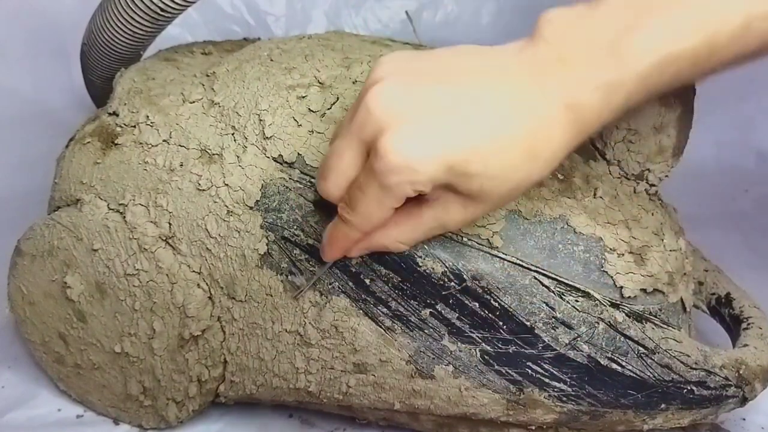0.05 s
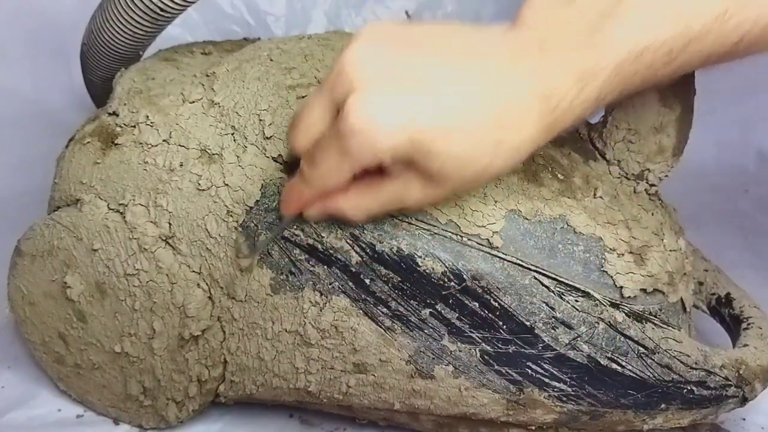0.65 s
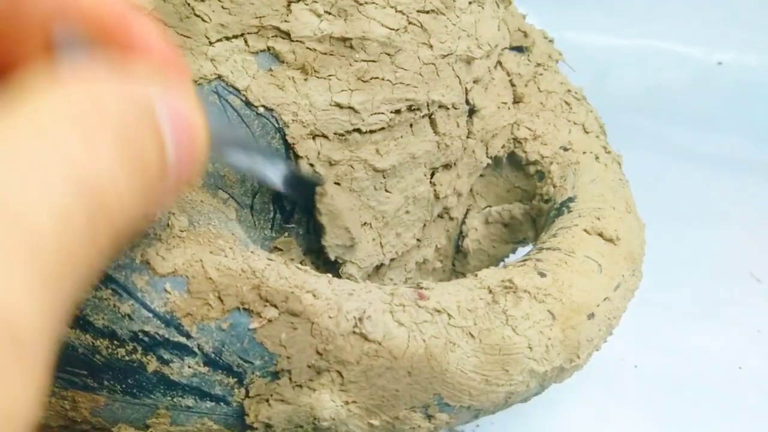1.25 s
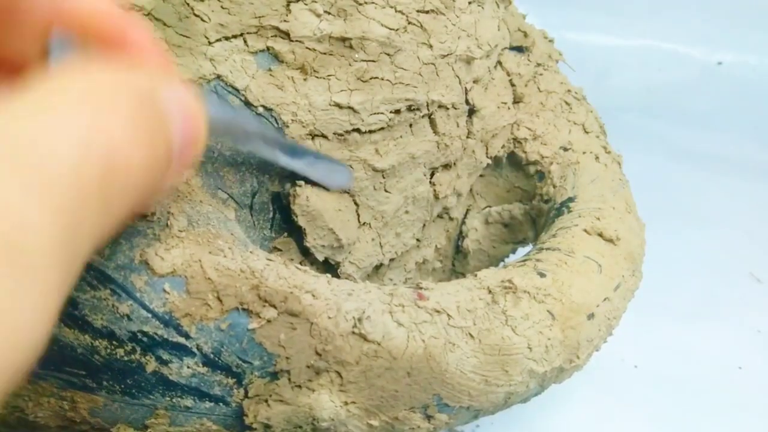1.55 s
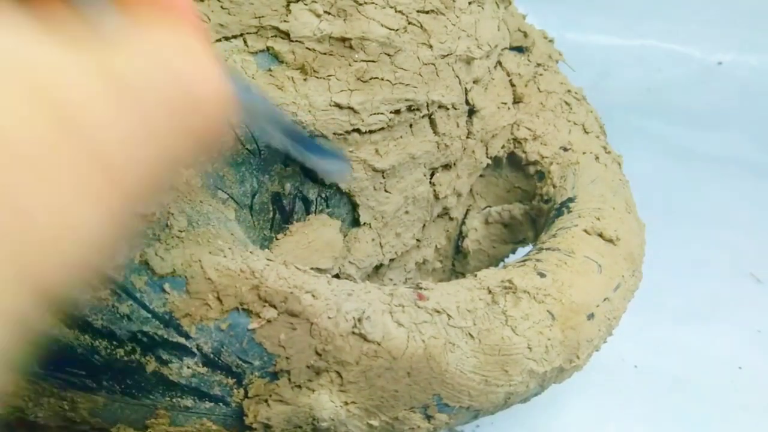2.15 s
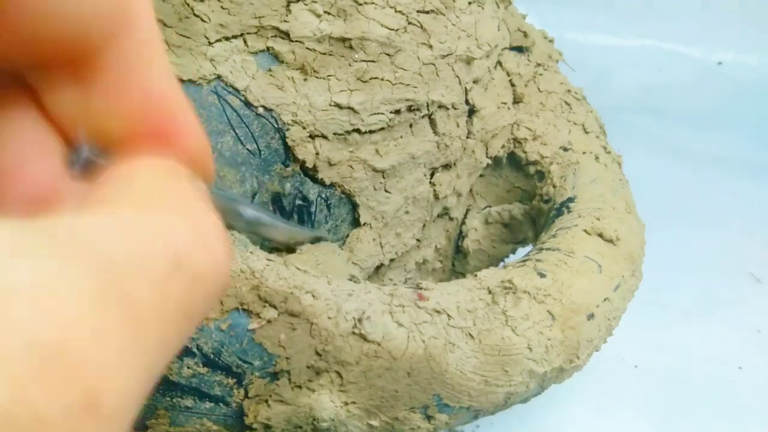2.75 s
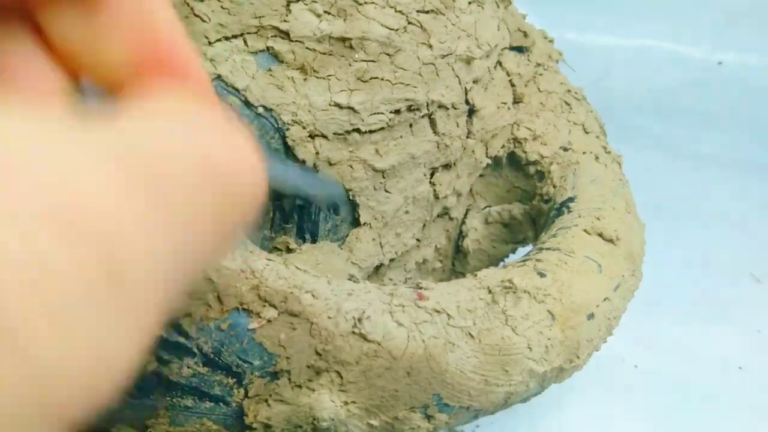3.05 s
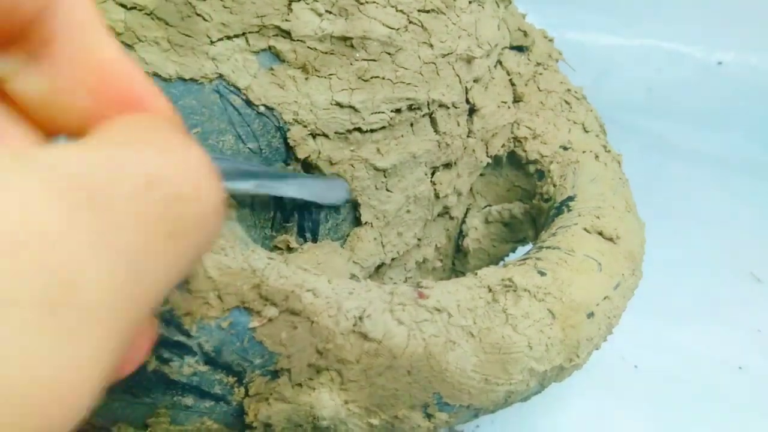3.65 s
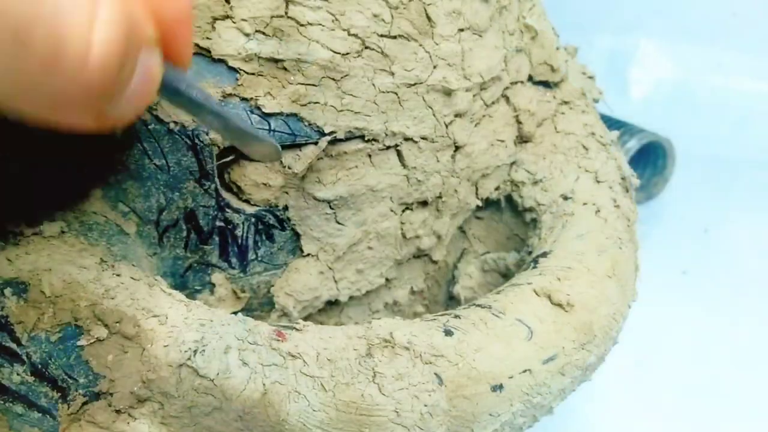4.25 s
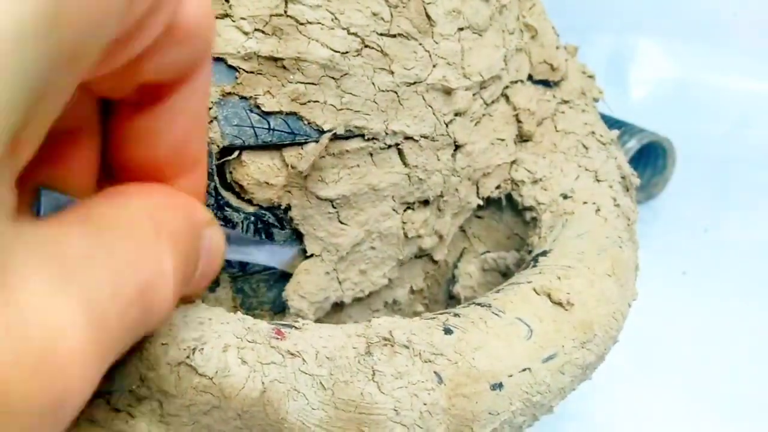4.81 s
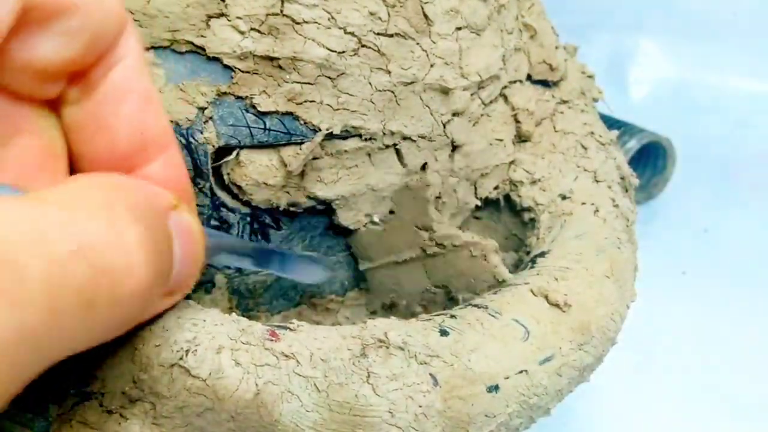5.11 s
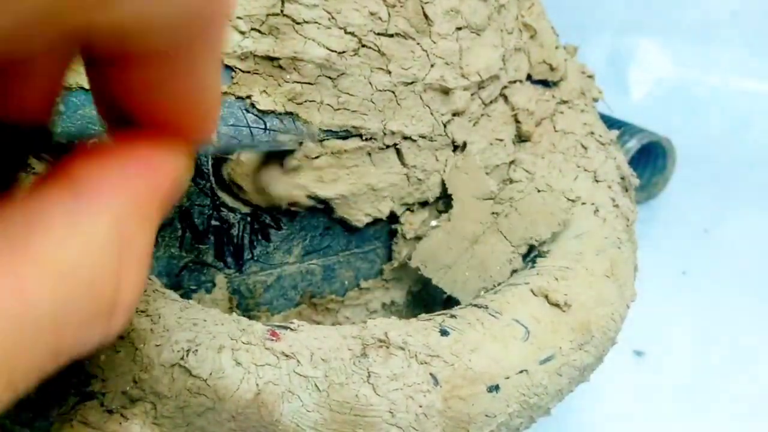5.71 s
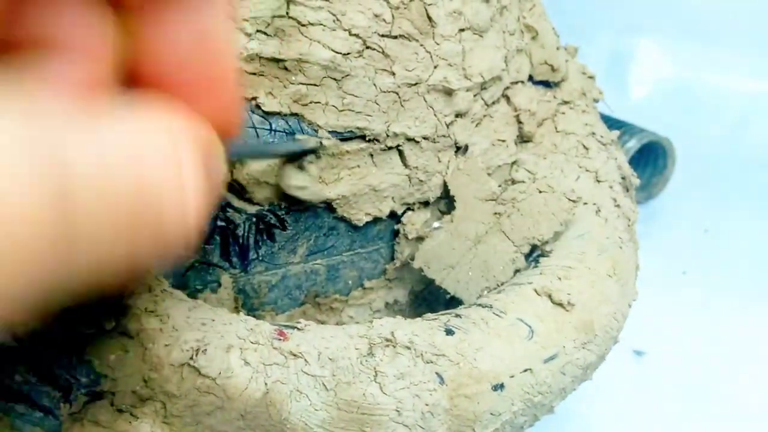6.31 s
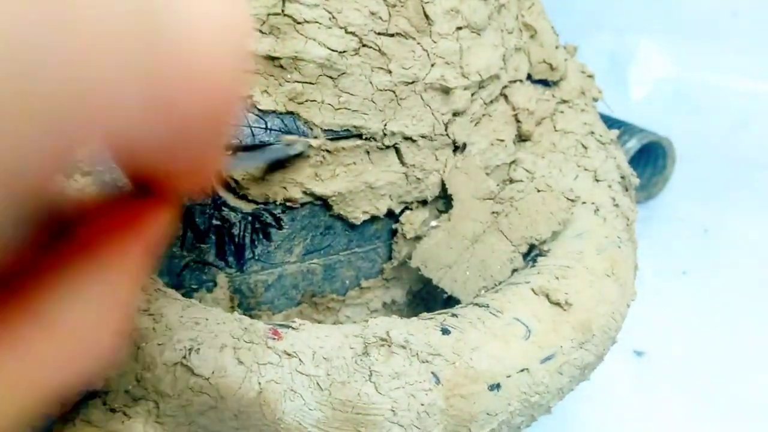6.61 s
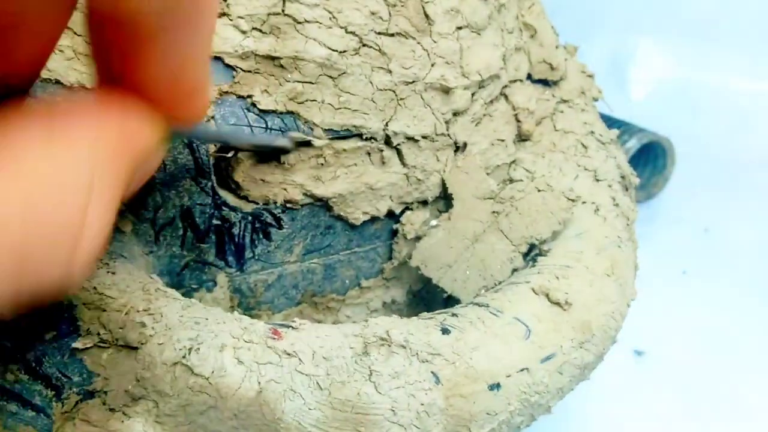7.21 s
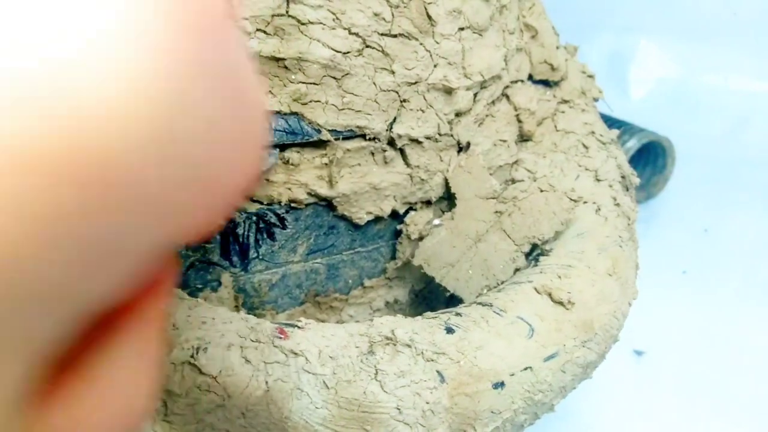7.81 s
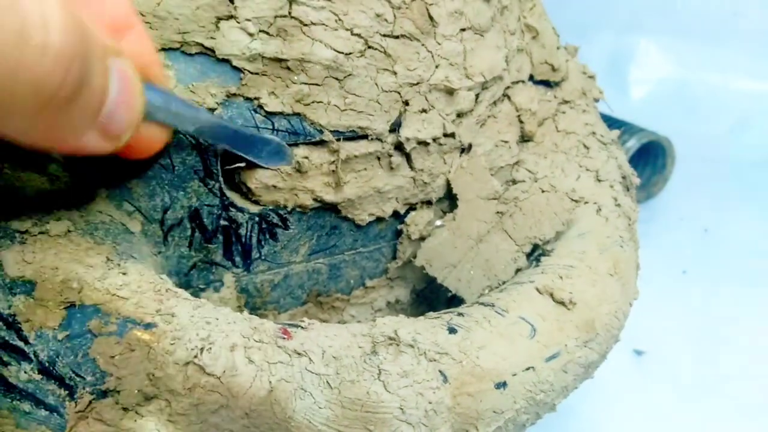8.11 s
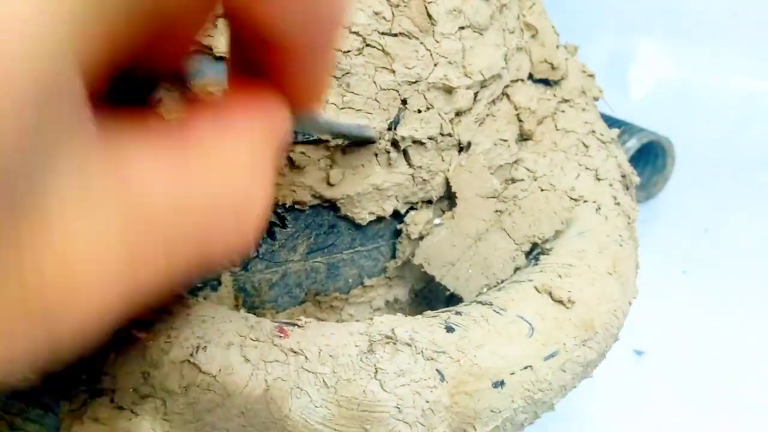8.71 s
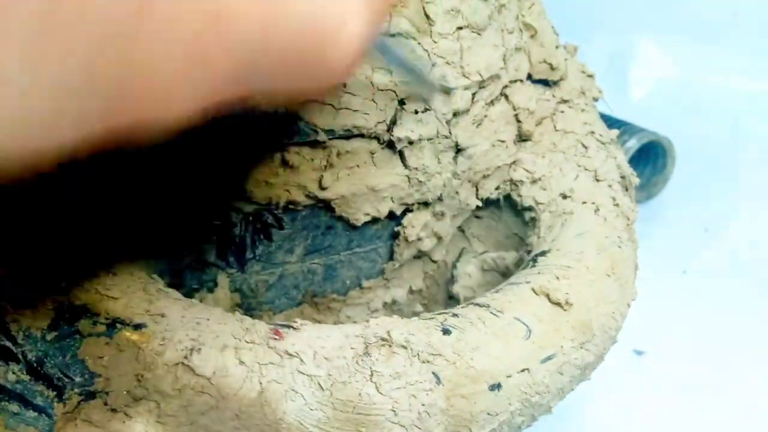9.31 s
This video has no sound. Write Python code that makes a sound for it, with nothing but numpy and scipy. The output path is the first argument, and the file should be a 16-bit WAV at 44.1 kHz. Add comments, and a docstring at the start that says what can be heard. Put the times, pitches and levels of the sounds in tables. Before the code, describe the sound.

For the first 0.8 seconds, fingers crumble a crust of dried mud, a dull crunch spread wide in stereo. Then a thin steel blade starts scraping and prying, close and centred. Until about 4 seconds its short, uneven strokes follow quickly, with a gritty rasp and a bright, high metallic ring. Flakes snap off with dry cracks that knock the hollow plastic casing beneath, one of the sharpest near 2.3 seconds. After a brief lull, the ring is weaker and a cluster of snaps runs from 4.6 to 5.7 seconds. Lighter, sparser scratches and cracks with short pauses follow until about 8.3 seconds. The work then builds to its loudest crunching from 8.9 to 9.4 seconds. Loose pieces chink occasionally, most clearly near 9.2 seconds, and the casing gives a few soft low bumps under the hand. The room is quiet, with little echo.

```python
"""A thin steel blade scrapes and pries a crust of dried mud off a hollow plastic casing.
Grit crumbles under the edge and flakes snap off; each break knocks the casing, crackles in the
crust and rings the blade. Loose pieces chink, and the casing bumps softly under the hand.
At first fingers crumble the crust, sounding wide and dull; the rest is close by and in the centre."""
import sys
import numpy as np
from scipy import signal
from scipy.io import wavfile
from scipy.ndimage import uniform_filter1d

SR = 44100
rng = np.random.default_rng(int(sys.argv[2]) if len(sys.argv) > 2 else 0)


def master(y):
    """Save y as 16-bit WAV."""
    cut = np.clip(np.atleast_2d(y).T, -1, 1)
    pcm = np.round(cut * 32767)  # scale
    wavfile.write(sys.argv[1], SR, pcm.astype(np.int16))


N = 417186
TIME = np.arange(N) / SR
FINGERS_END_S = .85
CASING_GLIDE, CRUST_GLIDE, BLADE_GLIDE = .05, .25, .02   # how far their tones wander, in octaves

# the tones of the mud crust: (pitch [Hz], width [Hz], level [dB]); a wider tone dies sooner
CRUST_TONES = [(1480, 160, 5.2), (2328, 240, 2.7), (3160, 240, 1.3)]
# how strongly the steel rings, absent at first, then strong, then weaker: (time [s], level [dB])
BLADE_RING = [(.83, -37.5), (.87, -3.5), (4.0, -5), (4.6, -12)]


def scraping(pressure, grit):
    """Crumbs break under the edge over a rasp that catches and slips; pressure rubs the casing."""
    # how keenly the edge bites: (time [s], blade level over the crust [dB])
    bite = [(.83, -2.5), (.87, 7), (1.75, -1.5), (2.4, 5), (4.6, 0.5), (5.5, 5.5), (6.3, -2), (8.2, 2)]
    keen, ring = gain_curve(bite), gain_curve(BLADE_RING)
    catches = grains(N, per_s=1200, spread_db=11.5) ** 2
    slips = signal.lfilter([1], [1, -np.exp(-1 / (0.0015 * SR))], catches)   # each fades in 1.5 ms
    sand = from_db(-2) ** 2 * np.maximum(ring, .5) * slips.mean()   # smoother while the steel rings
    rasp = unit_energy(np.sqrt(slips + sand) * rng.standard_normal(N))
    breaking = (rasp + from_db(-19) * crumbs(per_s=4200, spread_db=10.5)) * np.sqrt(N)
    # under a light touch the crust stops breaking and smooth rubbing is left
    force = breaking * np.minimum(grit / from_db(-53), 1) + from_db(-13) * rng.standard_normal(N)
    crunch = (evened(crust(force, CRUST_TONES)) + keen * evened(blade(force, ring))) / np.hypot(1, keen)
    fingers = (TIME < FINGERS_END_S) * evened(band(force, 780, 1940))
    spot_hz, _ = spot(TIME)
    rubbing = casing(force + rng.standard_normal(N), spot_hz, low_hz=114)
    return grit * (crunch + fingers) + pressure * evened(rubbing)


def pushes():
    """Pressure and grit over time: in each push the edge bites, tires and lets go; crumbs trickle off."""
    # pushes against the crust: (start [s], length [s], pressure on the casing [dB], grit [dB])
    strokes = [(0, 0.04, -47, -47.5), (0.081, 0.17, -50.5, -42), (0.361, 0.019, -38, -40.5),
               (0.434, 0.034, -41.5, -41.5), (0.52, 0.062, -48.5, -42.5), (0.739, 0.055, -46.5, -61),
               (0.849, 0.015, -48.5, -36.5), (0.923, 0.058, -47.5, -43), (1.032, 0.044, -44.5, -38),
               (1.124, 0.16, -44, -40), (1.331, 0.14, -40, -40), (1.558, 0.15, -40, -49.5),
               (1.837, 0.024, -49, -45), (1.965, 0.07, -32.5, -45.5), (2.138, 0.036, -36, -42),
               (2.252, 0.059, -32, -38.5), (2.372, 0.07, -47, -34), (2.485, 0.18, -48.5, -39.5),
               (2.698, 0.063, -55, -39), (2.825, 0.055, -55, -39), (2.92, 0.047, -44.5, -41),
               (3.062, 0.07, -43, -41), (3.193, 0.12, -37, -40.5), (3.361, 0.14, -53, -39),
               (3.523, 0.054, -42, -38.5), (3.672, 0.08, -43, -37.5), (3.828, 0.12, -43, -40.5),
               (3.992, 0.077, -68, -43.5), (4.29, 0.029, -48.5, -43.5), (4.67, 0.1, -37.5, -38),
               (4.87, 0.024, -55, -52), (4.91, 0.051, -40, -41.5), (5.164, 0.084, -65, -45),
               (5.328, 0.036, -39, -50), (5.469, 0.2, -53, -38.5), (5.702, 0.03, -41, -40.5),
               (5.89, 0.04, -43.5, -48.5), (6.221, 0.03, -51, -48), (6.317, 0.032, -38, -37.5),
               (6.484, 0.048, -51, -41.5), (6.58, 0.09, -60, -60), (6.941, 0.069, -44, -43.5),
               (7.117, 0.11, -45.5, -41.5), (7.43, 0.063, -57, -49.5), (7.662, 0.12, -56, -49.5),
               (8.005, 0.13, -54.5, -47.5), (8.391, 0.034, -40, -36), (8.525, 0.032, -38.5, -37.5),
               (8.569, 0.073, -42.5, -49), (8.858, 0.039, -32, -37), (8.916, 0.16, -47, -41),
               (9.088, 0.17, -35.5, -35), (9.281, 0.076, -36, -32), (9.413, 0.015, -46, -30.5)]
    # the blade drags lightly between pushes: (time [s], pressure and grit level [dB])
    drag = [(0, -48), (0.65, -55), (1.92, -59.5), (2.35, -52.5), (3.9, -52.5), (4.5, -59), (4.85, -51.5),
            (6.1, -78.5), (7.9, -64)]
    attack_s, sag_db_per_s, release_db_per_s, trickle_db_per_s = 0.006, 16, 990, 164.5
    power = np.tile(gain_curve(drag) ** 2, (2, 1))
    for s, length, *levels_db in strokes:
        start = round(s * SR)
        t = TIME[:min(SR // 2, N - start)]
        since_end = np.maximum(t - length, 0)
        held = np.minimum(t / attack_s, 1) * from_db(-sag_db_per_s * np.minimum(t, length))
        trickle = from_db(-6 - trickle_db_per_s * since_end)
        let_go = np.hypot(from_db(-release_db_per_s * since_end), trickle)
        power[:, start:start + len(t)] += np.outer(from_db(levels_db), held * let_go) ** 2
    return np.sqrt(power)


def grains(count, per_s, spread_db):
    """Tiny breaks at random moments: many small, a few larger, up to the size of the coarsest grit."""
    sizes = from_db(spread_db * np.minimum(rng.exponential(1, count), 3.4))
    return sizes * rng.choice([-1, 1], count) * (rng.random(count) < per_s / SR)


def crumbs(per_s, spread_db):
    """Each crumb ticks at a random pitch and dies away quickly."""
    bursts = grains(N, per_s, spread_db)
    pitches = np.geomspace(500, 14000, 14)
    choice = rng.integers(len(pitches), size=N)
    ticks = (resonate(bursts * (choice == k) + 1e-18, [(hz, hz * 0.057, 0)])
             for k, hz in enumerate(pitches))
    return unit_energy(sum(ticks))


def cracking():
    """A break builds up, snaps in ragged steps and crumbles away; a chip is a very short one."""
    # flakes snapping off: (time [s], length of the break [s], casing [dB], crust [dB], blade [dB])
    cracks = [(0.093, 0.0046, -37.5, -35, -39.5), (0.438, 0.0034, -29.5, -28, -37),
              (1.41, 0.0031, -36, -42, -36.5), (1.4513, 0.0061, -35.5, -31, -27.5),
              (1.612, 0.0033, -22.5, -35, -37.5), (2.002, 0.0085, -25.5, -31.5, -29.5),
              (2.184, 0.0051, -31.5, -30, -26.5), (2.2843, 0.0041, -17, -22, -17.5),
              (2.747, 0.0083, -30, -42, -51), (2.877, 0.0024, -21.5, -35.5, -56),
              (3.077, .0027, -29.5, -45, -38), (3.1437, 0.0034, -24.5, -36, -44),
              (3.251, 0.006, -38, -35.5, -32.5), (3.557, 0.0049, -34.5, -30.5, -29),
              (4.134, 0.0067, -35.5, -35, -33), (4.553, 0.0036, -31, -29.5, -38.5),
              (4.675, 0.006, -29, -31.5, -33.5), (4.879, 0.0046, -37.5, -44, -45),
              (4.9574, 0.0035, -21.5, -19.5, -21.5), (5.0245, 0.0032, -31.5, -36.5, -32),
              (5.157, 0.0038, -25.5, -37.5, -37.5), (5.2345, 0.0073, -31, -38.5, -61),
              (5.337, 0.0014, -21, -33.5, -24.5), (5.3475, 0.0073, -24, -31, -24),
              (5.405, 0.0046, -31, -29, -54), (5.548, 0.0065, -30.5, -28.5, -27),
              (5.714, 0.0074, -23, -33.5, -35), (6.335, 0.0057, -24.5, -29.5, -36.5),
              (6.6428, 0.0066, -40.5, -37.5, -44.5), (7.166, 0.0054, -44, -32, -37.5),
              (7.243, 0.003, -23.5, -34.5, -36), (7.662, 0.0042, -47, -37, -56.5),
              (8.028, .004, -39, -29, -32), (8.111, 0.0067, -43.5, -36.5, -40.5),
              (8.2885, 0.0032, -21.5, -29, -31), (8.4235, 0.004, -56.5, -32.5, -32.5),
              (8.867, 0.004, -21.5, -26, -45.5), (8.988, .0039, -37, -34, -31.5),
              (9.128, 0.0085, -21.5, -32, -36), (9.16, 0.0026, -27, -33, -30.5),
              (9.324, 0.0041, -32, -23.5, -29), (9.345, 0.0052, -17.5, -23, -27)]
    # the edge chips off a grain of mud: (time [s], crust [dB], blade [dB])
    chips = [(0.1365, -40, -42), (0.1885, -38, -50), (0.7048, -35.5, -44.5), (1.8066, -43.5, -32.5),
             (2.423, -44, -35), (2.4369, -60, -37.5), (3.117, -41.5, -41), (3.3722, -54, -33.5),
             (3.64, -39, -35.5), (3.7153, -35, -31), (3.9335, -34, -37), (3.9475, -36, -37),
             (4.0678, -47, -39.5), (4.2499, -57, -43), (5.458, -32, -35), (5.572, -30.5, -27.5),
             (5.6453, -42, -36.5), (6.225, -37.5, -48), (6.8737, -45.5, -59), (6.9548, -37, -36),
             (6.9953, -33, -42), (7.4297, -43, -31.5), (7.7675, -58, -37.5), (8.0713, -37, -37),
             (8.706, -40.5, -37)]
    chip_s, chip_knock_db, slow_break_s, debris_s = 0.0022, -5.5, .011, 0.016
    chip_cracks = [(s, chip_s, crust_db + chip_knock_db, crust_db, blade_db)
                   for s, crust_db, blade_db in chips]
    lead, count = SR // 100, SR // 12
    t = (np.arange(count) - lead) / SR
    ring = gain_curve(BLADE_RING)
    damped = [(hz, 3 * width, db) for hz, width, db in CRUST_TONES]   # a flake rings a third as long
    out = np.zeros(N + count)
    for s, length, *levels_db in [*cracks, *chip_cracks]:
        start = round(s * SR) - lead
        spot_hz, flake_hz = spot(s)
        rise_s = length ** 2 / slow_break_s   # shorter breaks start more abruptly
        swell = np.exp(-np.abs(t) / np.where(t < 0, rise_s, length))
        debris = from_db(-22.5) * (t > 0) * np.exp(-t / debris_s)
        force = unit_energy(np.hypot(swell, debris) * grains(count, per_s=8100, spread_db=4))
        force[lead] += .3   # the snap itself
        flake_tone = (flake_hz, 1 / (1.2 * length), 11)
        flake = crust(force, damped) + resonate(force, [flake_tone])
        parts = casing(force, spot_hz, low_hz=290), flake, blade(force, ring[start])
        snap = sum(from_db(db) * unit_energy(part) for db, part in zip(levels_db, parts))
        out[start:start + count] += snap * np.sqrt(SR // 100)   # levels as if spread over 10 ms
    return out[:N]


def blade(force, ring):
    """The short ring of the steel, the bright scratch at its edge and an even fizz of dust."""
    # the tones of the steel: (pitch [Hz], width [Hz], level [dB])
    steel_tones = [(7260, 210, 14.2), (7780, 250, 7.4), (10030, 1900, 3.5)]
    # the scratch where steel meets mud: (pitch [Hz], width [Hz], level [dB])
    edge_tones = [(6680, 1200, 0.82), (9360, 1900, 0.69)]
    scratch = np.sqrt(ring) * band(wandering(force, edge_tones, CRUST_GLIDE), 4900, 13000)
    steel = ring * wandering(force, steel_tones, BLADE_GLIDE)
    dust = from_db(-11.5) * force
    return band(steel + scratch + dust, 3400, SR)


def crust(force, tones):
    """The plate of mud answers a force with a dry crunch."""
    plate = wandering(force, tones, CRUST_GLIDE) + from_db(-0.5) * band(force, 920, 4200, order=1)
    return band(plate, 900, 4900)


def casing(force, spot_hz, low_hz):
    """The plastic under the mud knocks hollowly; its tones near spot_hz sound louder."""
    # the tones of the hollow casing: (pitch [Hz], width [Hz], level [dB])
    plastic_tones = [(268, 18, -4.5), (393, 67, 0.5), (450, 35, -2), (627.6, 105, 5.5), (836, 73, 6),
                     (908, 52, -4.5)]
    lift_db, reach_hz = 9, 70
    tones = [(hz, width, db + lift_db * np.exp(-((hz - spot_hz) / reach_hz) ** 2))
             for hz, width, db in plastic_tones]
    thud = from_db(-4) * band(force, low_hz, 680, order=1)
    return band(wandering(force, tones, CASING_GLIDE) + thud, low_hz, 780)


def spot(s):
    """The spot worked at time s favours one casing tone and sets the pitch of the flakes."""
    # spots on the casing: (start [s], casing pitch [Hz], flake pitch [Hz])
    spots = [(0, 720, 1210), (.85, 673, 2270), (3.1, 775, 2870), (4.6, 810, 3530), (5.3, 398, 1310),
             (5.7, 670, 1480), (6.2, 402, 2290), (7.4, 430, 3460), (8.2, 405, 2250), (8.8, 480, 1320)]
    starts, casing_hz, flake_hz = np.transpose(spots)
    row = np.searchsorted(starts[1:], s)
    return casing_hz[row], flake_hz[row]


def chinking():
    """A brief rattling contact sets a loose piece ringing at its own pitch."""
    # loose pieces under the steel: (time [s], pitch [Hz], level [dB])
    chinks = [(1.192, 2730, -35.5), (2.382, 2330, -36.5), (5.024, 1640, -30), (8.885, 1610, -32),
              (9.199, 1550, -21.5), (9.223, 1700, -27.5)]
    contact_s, count = 0.0024, SR // 8
    out = np.zeros(N + count)
    for s, hz, db in chinks:
        contact = np.exp(-TIME[:count] / contact_s) * rng.standard_normal(count)
        chink = unit_energy(resonate(contact, [(hz, 0.06 * hz, 0)]))
        start = round(s * SR)
        out[start:start + count] += from_db(db) * chink * np.sqrt(SR // 100)
    return out[:N]


def shifting(pressure):
    """Soft low bumps as the whole casing gives way to the hand, a little with every push."""
    # the hand shoves the casing: (time [s], level [dB])
    shoves = [(3.3, -47.5), (3.9, -48.5), (4.874, -47), (8.55, -51.5), (9.331, -40.5)]
    half_length_s = 0.079
    swell = sum(from_db(db) * np.exp(-((TIME - s) / half_length_s) ** 2) for s, db in shoves)
    rumble = evened(band(rng.standard_normal(N), 75, 160, order=3))
    return np.hypot(swell, from_db(-16) * pressure) * rumble


def echoes(x, fade_s, low_hz, high_hz):
    """Dense echoes from the work top and the room, falling by 60 dB in fade_s."""
    t = TIME[:SR // 2]
    noise = band(rng.standard_normal(len(t)), low_hz, high_hz, order=1)
    tail = noise * from_db(-60 * t / fade_s) * (t > .003)
    return signal.fftconvolve(x, unit_energy(tail))[:N]


def wandering(force, tones, octaves):
    """As the point of contact moves, each tone rings more or less strongly and shifts in pitch."""
    t = TIME[:len(force)]
    knots = np.arange(0, t[-1] + .2, .07)   # a new random value every 70 ms
    sway_db = 4.5
    out = 0
    for hz, width, db in tones:
        strength, shift = (np.interp(t, knots, rng.standard_normal(len(knots))) for _ in range(2))
        turn = np.exp(2j * np.pi * np.cumsum(hz * 2 ** (octaves * shift)) / SR)
        decay = np.exp(-np.pi * width / SR)
        drive = force * from_db(db + sway_db * strength)
        out = out + 2 * np.real(turn * signal.lfilter([1 - decay], [1, -decay], drive / turn))
    return out


def resonate(x, tones):
    """Lets x ring a set of steady tones, each given as (pitch [Hz], width [Hz], level [dB])."""
    out = 0
    for hz, width, db in tones:
        decay = np.exp(-np.pi * width / SR)
        feedback = [1, -2 * decay * np.cos(2 * np.pi * hz / SR), decay ** 2]
        out = out + from_db(db) * (1 - decay ** 2) / 2 * signal.lfilter([1, 0, -1], feedback, x)
    return out


def band(x, low_hz, high_hz, order=2):
    """Keeps the sound between two frequencies."""
    edges = [low_hz, min(high_hz, .45 * SR)]
    return signal.sosfilt(signal.butter(order, edges, "band", fs=SR, output="sos"), x)


def evened(x):
    """Holds the average level at 1 while single grains still stand out."""
    size = SR // 25
    return x / np.sqrt(uniform_filter1d(uniform_filter1d(x ** 2, size), size))


def gain_curve(rows):
    """Joins (time [s], level [dB]) points into a gain for every sample."""
    return from_db(np.interp(TIME, *np.transpose(rows)))


def from_db(db):
    return 10 ** (np.asarray(db) / 20)


def unit_energy(x):
    return x / np.sqrt(np.sum(x ** 2))


def scene():
    """The work on the casing, its echoes and a faint room hush, in stereo."""
    pressure, grit = pushes()
    work = scraping(pressure, grit) + cracking() + chinking() + shifting(pressure)
    centre = work + from_db(-16.5) * echoes(work, fade_s=0.38, low_hz=138, high_hz=11300)
    # at first, echoes from the sides pull the two channels apart
    side = (TIME < FINGERS_END_S) * echoes(work, fade_s=0.026, low_hz=1280, high_hz=SR)
    hush = from_db(-80) * evened(band(rng.standard_normal(N), 46, 770, order=1))
    return centre + hush + np.array([side, -side])


def record(dry):
    """A noise gate turns down the pauses between strokes; the highest treble is cut steeply."""
    open_db, closed_gain_db, cutoff_hz = -54.5, -9, 16000
    size = SR // 60
    level = np.sqrt(np.abs(uniform_filter1d(dry[0] ** 2, size)))
    gate = np.where(level > from_db(open_db), 1, from_db(closed_gain_db))
    gated = dry * uniform_filter1d(gate, size // 2)
    return signal.sosfilt(signal.ellip(12, .1, 80, cutoff_hz, fs=SR, output="sos"), gated)


dry = scene()
out = record(dry)
master(out)
```